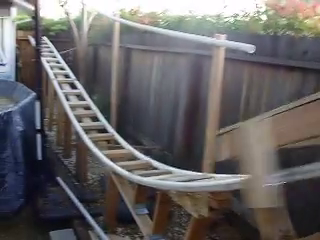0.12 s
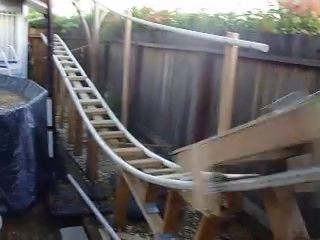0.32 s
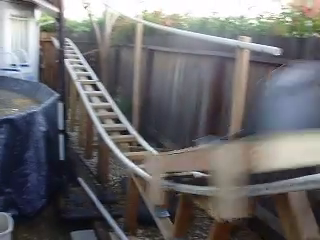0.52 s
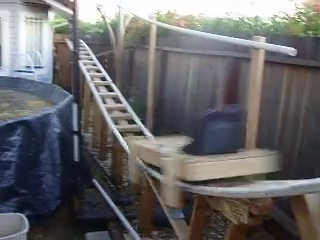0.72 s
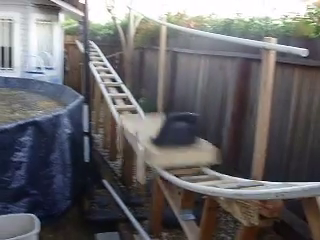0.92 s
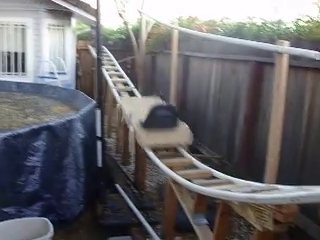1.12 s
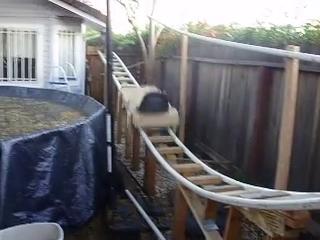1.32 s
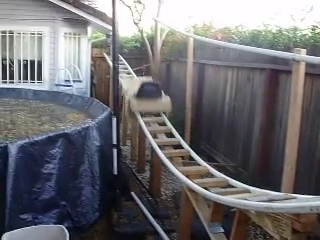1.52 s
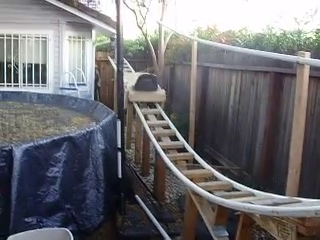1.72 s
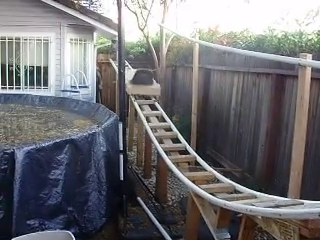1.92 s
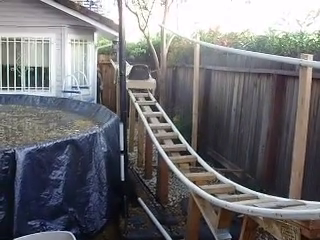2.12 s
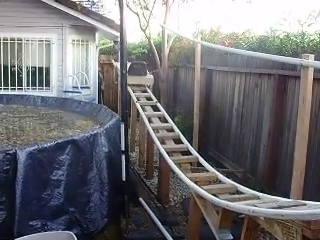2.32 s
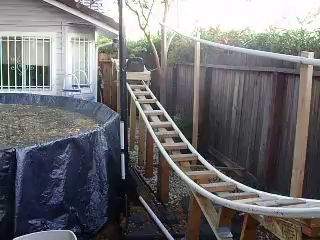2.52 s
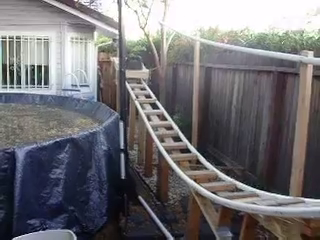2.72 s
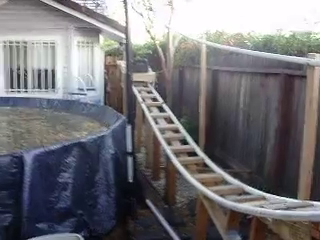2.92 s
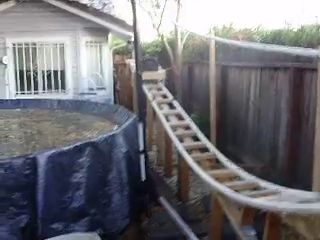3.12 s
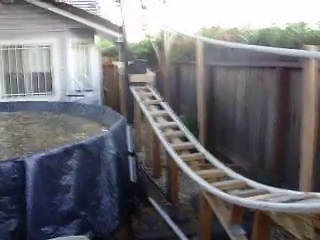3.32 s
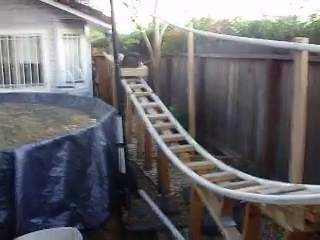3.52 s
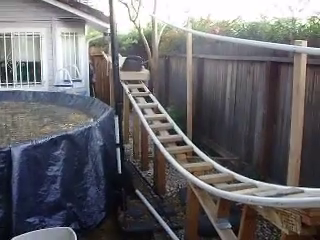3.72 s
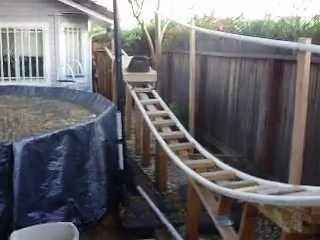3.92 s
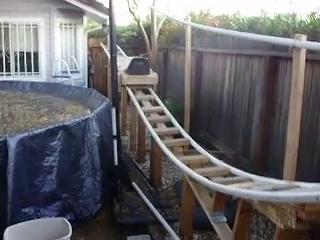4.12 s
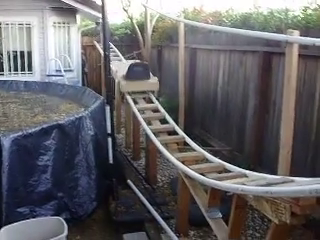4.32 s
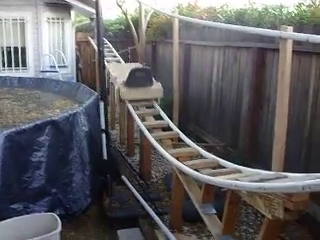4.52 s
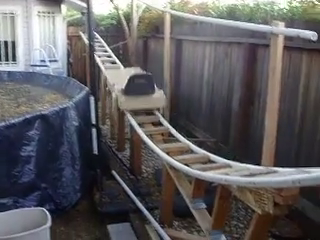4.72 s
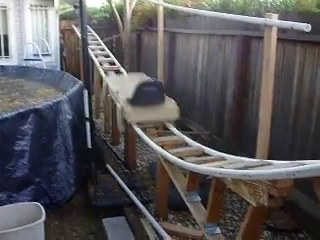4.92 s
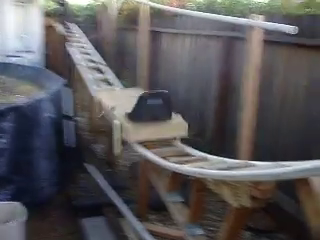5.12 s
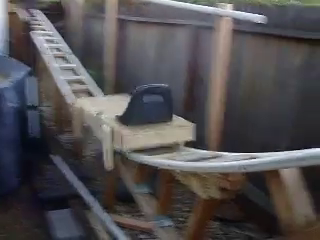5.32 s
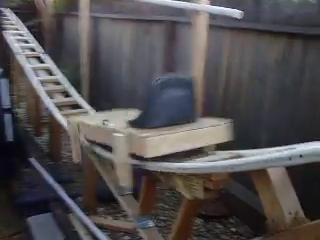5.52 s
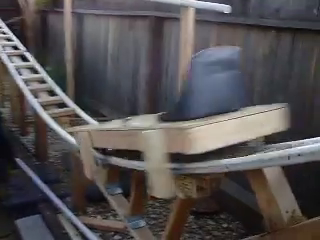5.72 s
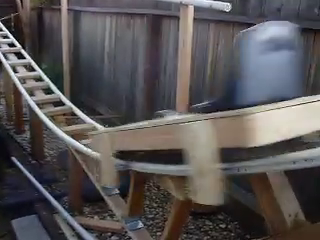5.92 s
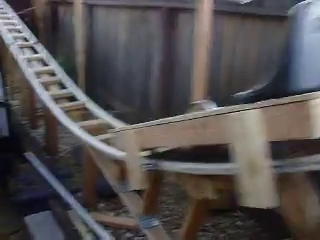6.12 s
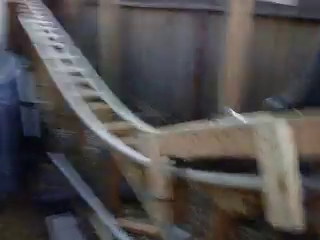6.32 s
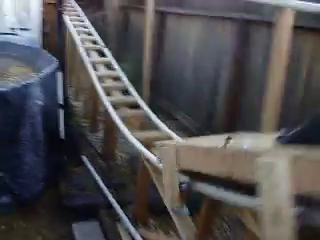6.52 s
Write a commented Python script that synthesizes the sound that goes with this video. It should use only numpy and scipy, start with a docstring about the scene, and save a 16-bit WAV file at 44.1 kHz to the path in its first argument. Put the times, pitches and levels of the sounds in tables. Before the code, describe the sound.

Loud rumbling and rattling knocks come from a home-made wooden car running on a pipe track in a backyard. The noise dies down as the car stalls farther off, and a soft neighbourhood hum shows through. The car rolls back with a deeper boom and quickening clatter, stops nearby and starts gently away. The sound is slightly muffled, with brief echoes and some distortion on close hits.

```python
"""A home-made wooden coaster car rolls past on pipe rails, its wheels grinding and ringing on the pipes
and booming in the frame. It knocks and rattles over ties and joints; near blows overload the microphone.
After three seconds it stalls up the far slope, and a distant hum comes through. It then clatters back,
stops short of the microphone at about six seconds and starts gently away again.
All along, the fenced yard answers with echoes."""
import sys
import numpy as np
from scipy import signal
from scipy.fft import rfft, irfft, next_fast_len
from scipy.io import wavfile

SR = 44100
rng = np.random.default_rng(int(sys.argv[2]) if len(sys.argv) > 2 else 0)


def to_wav(sig):
    """Store sig (one row per channel, or 1-D mono) as 16-bit WAV at the path in sys.argv[1].

    Samples outside -1..1 are clipped; the rate is SR.
    """
    pcm = np.clip(np.atleast_2d(sig), -1, 1) * 32767
    pcm = np.round(pcm).astype(np.int16)
    wavfile.write(sys.argv[1], SR, pcm.T)  # frames by channels


N = 288855
BINS = np.fft.rfftfreq(8192, 1 / SR)  # the frequencies, in Hz, at which tone curves are drawn

# The notes at which frame and pipes ring. Each row: pitch in Hz, width in Hz, boost in dB.
FRAME_RESONANCES = [(198, 10.1, 16), (307, 32, 5.5), (415.3, 22, 2.5), (450, 39, 0), (584.3, 15, 5),
                    (783, 70, 3.5), (880, 73, 1), (1239, 20, -2), (1622, 100, 2.5), (2413, 227, 6),
                    (3480, 350, 3)]


def rolling(chatter_db=0.54, grit_flutter_db=-0.9):
    """Rough spots under the wheels shake frame and pipes; the wheels chatter as their load shifts."""
    # The broad tone of the rolling. Each row: frequency in Hz, relative level in dB.
    roll_tone = [(10, -22), (35, -12.5), (110, -14), (180, -8), (255, -6), (340, -2), (480, -1.5),
                 (650, 1.5), (900, 3), (1250, -2.5), (1700, -7.5), (2100, -9.5), (3300, -20), (4200, -28)]
    speed, distance = motion()
    force = contacts(N, per_s=6000, spread_db=3) * gain_of(rolling_db() + chatter_db * waver(hz=35))
    sound = signal.oaconvolve(force, impulse_response(tone_curve(roll_tone, FRAME_RESONANCES)))[:N]
    filters = [signal.firwin2(1023, BINS, share, fs=SR) for share in bass_and_treble()]
    boom, grit = (signal.oaconvolve(sound, taps, "same") for taps in filters)
    middle = sound - boom - grit
    # The frame's boom stands out most when the car is slow, near or rolling backwards.
    backwards = np.clip(-speed, 0, 1)
    boom_db = 6.5 - 3.5 * doublings(speed) - 3 * np.log2(distance) + 6 * backwards
    grit_db = 0.5 - 0.5 * np.log2(distance) + grit_flutter_db * waver(hz=44.5)
    return boom * gain_of(boom_db) + middle + grit * gain_of(grit_db)


def wheel_ring(pitch_hz=929.7, width_hz=101, wander=0.16, relative_db=-6, flutter_db=3):
    """The wheels ring on the pipes at a pitch that wanders with their shifting load."""
    hz = pitch_hz * np.exp(wander * waver(hz=40.01))
    tone = np.exp(2j * np.pi * np.cumsum(hz) / SR)
    # Smoothed noise blurs the pure tone into a narrow band.
    pole = np.exp(-np.pi * width_hz / SR)
    blur = rng.standard_normal(N) + 1j * rng.standard_normal(N)
    for _ in range(2):
        blur = signal.lfilter([1 - pole], [1, -pole], blur)
    level_db = rolling_db() + relative_db + flutter_db * waver(hz=20)
    return unit_rms((blur * tone).real) * gain_of(level_db)


def track_knocks():
    """Clatters, thuds and ticks all strike the same frame and pipes."""
    # Wheels hitting ties and joints.
    # Each row: start in seconds, level in dB, length of the rattle in seconds, treble boost in dB.
    clatters = [(.004, -7, 0.007, -0.5), (.199, 1, 0.016, -2), (.333, -2.5, 0.02, 2),
                (.503, -5.5, 0.015, -3.5), (.582, -12, 0.011, 7), (.653, -9, 0.037, 0.5),
                (.79, -7, 0.017, 1.5), (.835, -3, 0.024, 2), (0.916, -2, 0.042, -1.5),
                (1.042, -9, 0.0094, 6), (1.137, -4.5, 0.038, -0.5), (1.236, -10, 0.014, 8.5),
                (1.345, -8, 0.031, -0.5), (1.425, -11, 0.038, 2.5), (1.6, -8, .016, -1.5),
                (1.812, -14, 0.0088, 6), (2.023, -12, 0.046, 1), (2.261, -14.5, 0.012, -3),
                (2.283, -17, 0.022, 1), (2.539, -20, 0.018, -3.5), (2.607, -20.5, 0.024, -2),
                (3.94, -11, .003, -8.5), (3.963, -9.5, 0.0061, -3), (4.206, -16, 0.033, -7.5),
                (4.412, -7, 0.032, 1.5), (4.611, -8.5, .014, -0.5), (4.76, -3, 0.011, -3),
                (4.874, -3.5, 0.0051, -1), (4.906, -7.5, 0.032, -5.5), (4.989, -3, 0.052, 2),
                (5.103, -10.5, 0.017, 4), (5.148, -4, 0.012, 3), (5.199, -4, 0.0027, -8),
                (5.24, -5.5, .014, -14), (5.311, -6.5, 0.0056, -2), (5.502, -2, 0.017, 0.5),
                (5.554, -9, 0.025, 0), (5.73, -3, 0.025, 0.5), (5.866, -6, 0.022, -0.5),
                (5.955, -21.5, 0.017, 2.5), (5.98, -12.5, 0.015, 3)]
    # The frame bumping softly on its supports. Each row: start in seconds, level in dB.
    thuds = [(.972, -11.5), (1.655, -23.5), (5.416, -8.5), (6.387, -25)]
    # Single clicks of a loose wheel. Each row: start in seconds, level in dB.
    ticks = [(.461, -8), (2.717, -28.5), (3.296, -33.5), (3.469, -32), (3.793, -31), (4.375, -12.5),
             (4.561, -12.5), (5.801, -10.5), (6.301, -30.5), (6.456, -19.5)]
    out = np.zeros(N)
    for start, db, rattle_s, treble_db in clatters:
        add(out, start, knock(db, rattle_s, bass_db=1.5, treble_db=treble_db))
    for start, db in thuds:
        add(out, start, knock(db, rattle_s=0.015, bass_db=13.5, treble_db=-3.5))
    for start, db in ticks:
        add(out, start, knock(db, rattle_s=0.002, bass_db=-3.5, treble_db=5.5))
    return out


def knock(db, rattle_s, bass_db, treble_db, detune=0.038, vary_db=2):
    """One clack, after which the loose wheels and boards rattle and settle."""
    # The broad tone of a blow. Each row: frequency in Hz, relative level in dB.
    knock_tone = [(10, -30), (40, -19.5), (110, -18.5), (190, -12.5), (350, -9), (450, -5), (600, -3.5),
                  (820, 0.5), (1150, 1.5), (1600, -4), (2100, -6), (2800, -9), (3500, -11.5), (4200, -26)]
    t = np.arange(SR // 5) / SR
    settle_s = 0.025 * rattle_s / (rattle_s + 0.0047)  # a single tick dies faster than a long rattle
    rise_s = 0.042 * settle_s
    envelope = (1 - np.exp(-t / rise_s)) * np.exp(-np.maximum(t - rattle_s, 0) / settle_s)
    force = envelope * contacts(len(t), per_s=3500, spread_db=1.5)
    force[0] += 5.5  # the wheel meets the edge harder than the bounces that follow
    force *= np.linalg.norm(envelope) / np.linalg.norm(force)
    # Every stretch of track rings a little differently.
    resonances = [(hz * (1 + detune * rng.normal()), width, boost + vary_db * rng.normal())
                  for hz, width, boost in FRAME_RESONANCES]
    bass, treble = bass_and_treble()
    blow = impulse_response(tone_curve(knock_tone, resonances) + bass_db * bass + treble_db * treble)
    return gain_of(db) * signal.fftconvolve(force, blow)


def loose_boards(count=70, relative_db=-4, spread_db=4.5):
    """Loose boards tap at uneven intervals, harder when the car goes faster."""
    roll_db = rolling_db()
    out = np.zeros(N)
    for k, (late, size) in enumerate(rng.random((count, 2))):
        at = int((k + late) * N / count)
        db = roll_db[at] + relative_db + spread_db * (2 * size - 1)
        add(out, at / SR, knock(db, rattle_s=0.0027, bass_db=0, treble_db=1.5))
    return out


def motion(mic_along_m=1.4, mic_aside_m=0.84):
    """The car's speed in m/s and its distance from the microphone in metres, at every sample."""
    # The car's run. Each row: time in seconds, speed in m/s (negative is backwards).
    speeds = [(0, 3), (.17, 3.5), (.65, 4), (1.15, 4), (1.33, 2.5), (1.58, 2.3), (1.76, 1.72), (2.17, 1.5),
              (2.45, 0.55), (3.05, 0), (3.8, -0.3), (4.3, -0.85), (4.7, -1.76), (5.15, -2.5), (5.95, -2),
              (6.14, 0.57), (6.38, 0.5), (6.55, 1.23)]
    speed = over_time(speeds)
    position = np.cumsum(speed) / SR
    return speed, np.hypot(position - mic_along_m, mic_aside_m)


def rolling_db(base_db=-28, db_per_doubling=9):
    """The level that rolling, ringing and boards all follow: faster is louder."""
    speed, _ = motion()
    return base_db + db_per_doubling * doublings(speed)


def doublings(speed, floor_m_s=0.24):
    """How often the speed has doubled from 1 m/s; the floor keeps a stalled car from going silent."""
    return np.log2(np.hypot(speed, floor_m_s))


def yard(car, level_db=-0.74, reach_m=6.3, steps=48):
    """The echoes change as the car moves, and take a larger share the farther away it is."""
    _, distance = motion()
    echo_share = (distance / reach_m) ** 0.75
    direct = car * gain_of(level_db) / np.sqrt(1 + echo_share ** 2 / 2)
    out = direct.copy()
    spot = np.linspace(0, steps, N)
    for k in range(steps + 1):
        here = np.flatnonzero(abs(spot - k) < 1)
        crossfade = np.cos(np.pi / 2 * (spot[here] - k))
        sent = direct[here] * echo_share[here] * crossfade
        add(out, here[0] / SR, signal.fftconvolve(sent, echoes()))
    return out


def echoes(tail_db=-6, scatter_per_s=3000, delay_spread=0.25):
    """The yard's answer from one spot: a few hard echoes and a fading tail of scattered ones."""
    # Echoes off ground, fence and house. Each row: typical delay in seconds, level in dB.
    reflections = [(.0043, -18), (.0097, -28), (0.0174, -13.5), (0.0273, -20.5)]
    # How long the yard rings. Each row: frequency in Hz, seconds to fade by 60 dB.
    fade_times = [(150, 0.37), (600, 0.43), (1500, 0.72), (4000, 0.62)]
    t = np.arange(SR // 2) / SR
    signs = rng.choice([-1., 1.], len(t))
    scatter = signs * (rng.random(len(t)) < scatter_per_s / SR) * (t > 0.005)
    hz, age, spectrum = signal.stft(scatter, SR, nperseg=256)
    fade = gain_of(-60 * age / over_frequency(fade_times, hz)[:, None])
    _, tail = signal.istft(spectrum * fade, SR, nperseg=256)
    response = gain_of(tail_db) * tail / np.linalg.norm(tail)
    for delay, db in reflections:
        add(response, delay * np.exp(delay_spread * rng.normal()), gain_of([db]))
    return response


def distant_hum(waver_db=1.3):
    """The neighbourhood hums far off: a soft noise that wavers and grows fainter."""
    # The broad tone of the hum. Each row: frequency in Hz, relative level in dB.
    hum_tone = [(10, -14), (45, -10.5), (95, -17.5), (170, -15), (260, -21), (350, -18.5), (480, -12.5),
                (650, -8), (900, -7), (1250, -9.5), (1850, -18), (2400, -20), (3000, -28), (4200, -42.5)]
    # Pitches that stand out of it. Each row: pitch in Hz, width in Hz, boost in dB.
    hum_resonances = [(185, 67, 6.5), (602, 40, 1.5), (694.4, 67, 7.5), (794, 55, 7), (1193, 160, 3),
                      (3740, 58, 13)]
    # How loud the hum is. Each row: time in seconds, level in dB.
    hum_levels = [(0, -22), (3.3, -29.5), (4.6, -28), (6.15, -35.5), (6.55, -39.5)]
    noise = rng.standard_normal(N)
    hum = signal.oaconvolve(noise, impulse_response(tone_curve(hum_tone, hum_resonances)))[:N]
    return unit_rms(hum) * gain_of(over_time(hum_levels) + waver_db * waver(hz=12))


def contacts(samples, per_s, spread_db):
    """Tiny impacts at random moments; a few are much larger than the rest."""
    size = gain_of(spread_db * np.minimum(rng.exponential(1, samples), 4))
    signs = rng.choice([-1, 1], samples)
    return unit_rms(size * signs * (rng.random(samples) < per_s / SR))


def waver(hz):
    """A random wobble of size about one, moving at rates up to about hz."""
    size = next_fast_len(N)
    smoothing = 1 + (np.fft.rfftfreq(size, 1 / SR) / hz) ** 4
    return unit_rms(irfft(rfft(rng.standard_normal(size)) / smoothing, size)[:N])


def tone_curve(points, resonances):
    """A broad tone with peaks standing out of it, in dB, scaled to an average power of one."""
    top_hz = points[-1][0]
    db = over_frequency(points, BINS) - 40 * np.log2(np.clip(BINS / top_hz, 1, 2))
    for hz, width, boost_db in resonances:
        db = db + boost_db / (1 + (2 * (BINS - hz) / width) ** 2)
    return db - 10 * np.log10(np.mean(gain_of(db) ** 2))


def impulse_response(db):
    """How something with this tone curve rings after one sharp tap."""
    log_gain = np.log(gain_of(np.r_[db, db[-2:0:-1]]))
    spectrum = np.exp(np.conj(signal.hilbert(log_gain)))  # minimum phase: no sound before the tap
    return np.fft.ifft(spectrum).real[:len(db) // 2]


def bass_and_treble(bass_hz=450, treble_hz=1500):
    """How much each frequency belongs to the frame's boom and to the contact's crack, from 0 to 1."""
    return 1 / (1 + (BINS / bass_hz) ** 6), 1 - 1 / (1 + (BINS / treble_hz) ** 6)


def over_frequency(points, hz):
    """Joins a table's rows with straight lines on a scale of octaves."""
    frequencies, values = np.transpose(points)
    return np.interp(np.log(hz + 1), np.log(frequencies + 1), values)


def over_time(points):
    """Joins a table's rows with straight lines, giving a value at every sample."""
    seconds, values = np.transpose(points)
    return np.interp(np.arange(N) / SR, seconds, values)


def gain_of(db):
    """Turns decibels into a factor to multiply by."""
    return 10 ** (np.asarray(db) / 20)


def unit_rms(x):
    """Scales a signal to an average power of one."""
    return x / np.sqrt(np.mean(x ** 2) + 1e-20)


def add(mix, start_s, sound):
    """Lays a sound into the mix at its start time."""
    part = mix[max(round(start_s * SR), 0):][:len(sound)]
    part += sound[:len(part)]


def scene():
    """The car in the yard, over the hum, in one channel."""
    car = rolling() + wheel_ring() + track_knocks() + loose_boards()
    return (yard(car) + distant_hum())[None]


def record(dry, mic_hz=4320, ceiling=0.74, top_hz=15900):
    """A dull-sounding microphone overloads: loud peaks are cut flat, which adds a rasping treble."""
    # How the recorder softens that treble. Each row: frequency in Hz, gain in dB.
    treble_cut = [(4700, -10), (6500, -5), (10000, -3.5), (15000, -6)]
    mic_filter = signal.firwin(255, mic_hz, window=("kaiser", 7), fs=SR)
    dull = signal.oaconvolve(dry, mic_filter[None], "same")
    clipped = dull / (1 + (dull / ceiling) ** 30) ** (1 / 30)
    tone = gain_of(over_frequency([(4000, 0)] + list(treble_cut), BINS))
    softened = signal.oaconvolve(clipped, signal.firwin2(127, BINS, tone, fs=SR)[None], "same")
    top_filter = signal.firwin(511, top_hz, window=("kaiser", 9), fs=SR)
    return signal.oaconvolve(softened, top_filter[None], "same")


dry = scene()
out = record(dry)
to_wav(out)
```